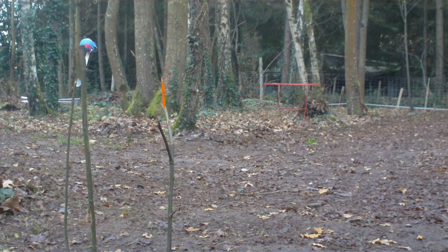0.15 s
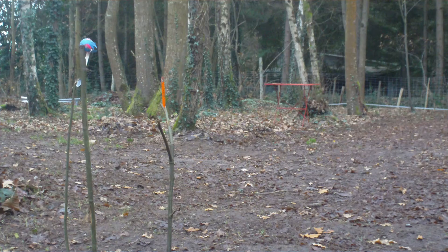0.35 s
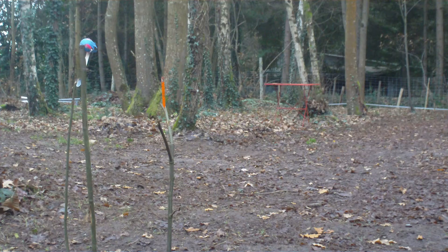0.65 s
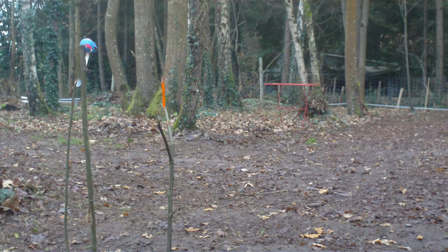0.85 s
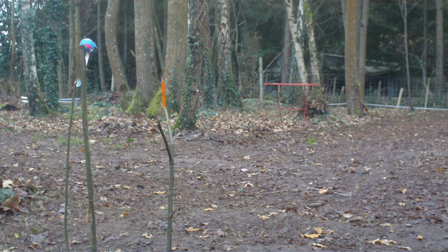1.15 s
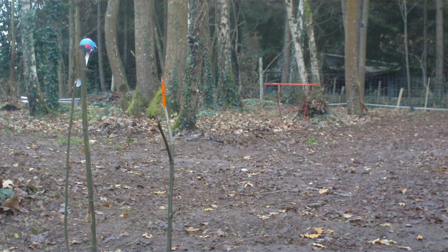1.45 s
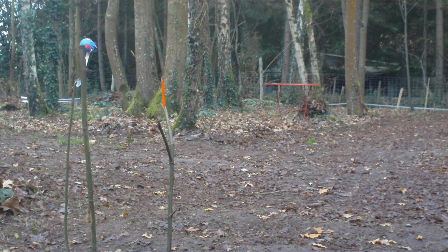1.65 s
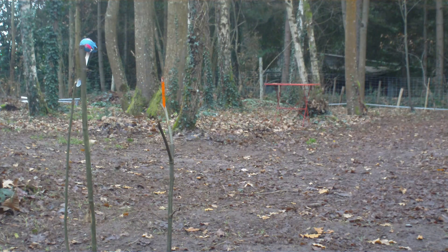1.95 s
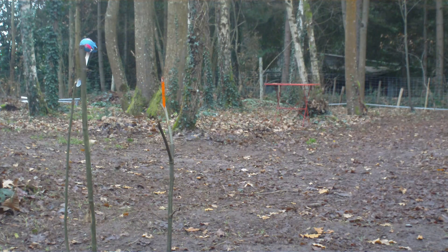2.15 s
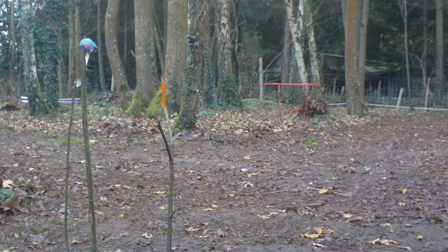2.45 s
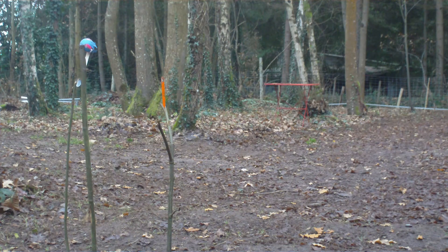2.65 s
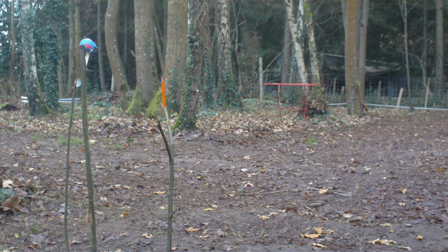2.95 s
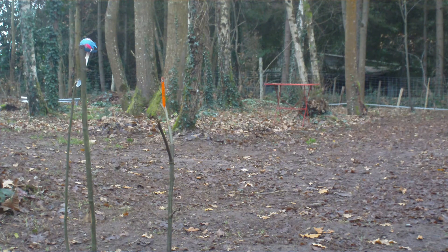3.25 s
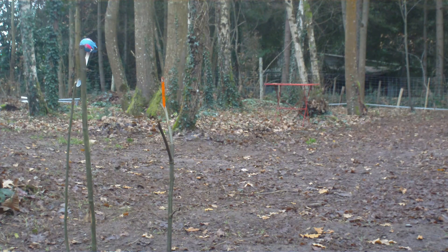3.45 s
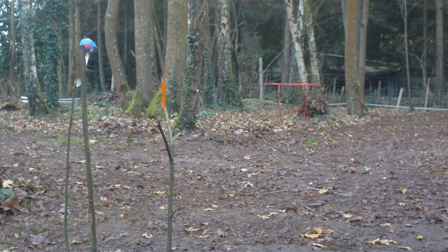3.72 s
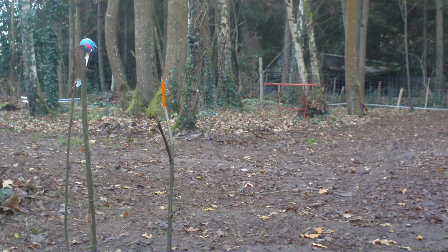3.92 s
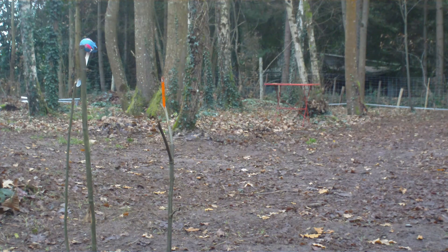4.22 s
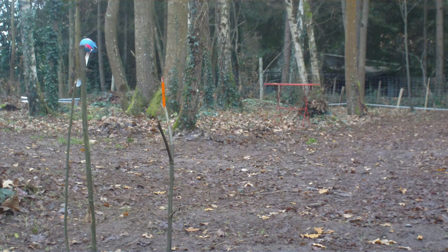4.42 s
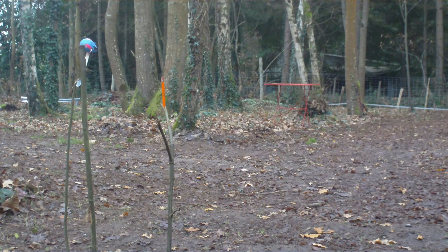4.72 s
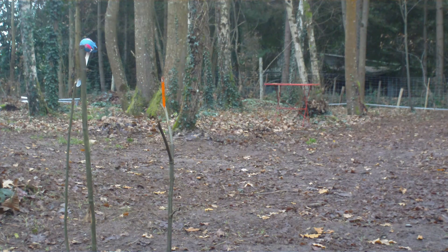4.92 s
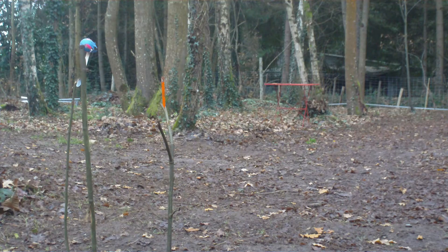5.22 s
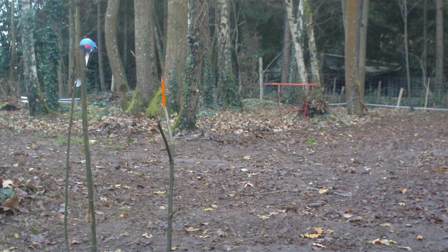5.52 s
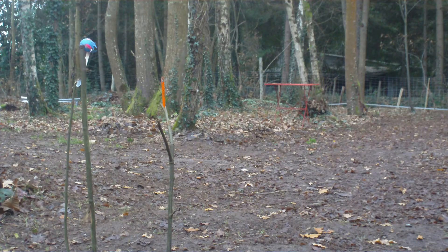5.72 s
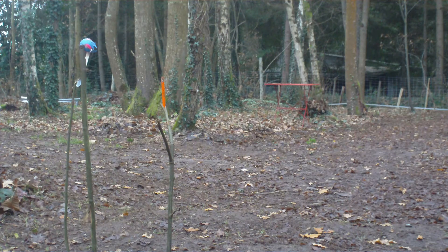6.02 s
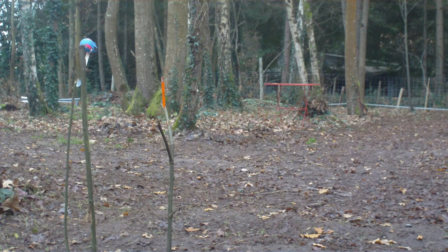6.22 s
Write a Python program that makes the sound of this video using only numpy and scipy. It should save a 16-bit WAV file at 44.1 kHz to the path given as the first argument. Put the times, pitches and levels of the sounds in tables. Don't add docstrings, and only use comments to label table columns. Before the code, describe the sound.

A damp wood with soft distant traffic hum, faint leaf hiss, ticking drips and thin high birds. A twig knocks early on. Past the middle, slingshot bands slap, a ball hisses and whistles by, and a very loud smack hits a target right at the microphone, overloading it. Trunk echoes scatter and fade, then drips, buzzing birdsong and a faint leaf rustle return.

```python
import sys
import numpy as np
from scipy import signal
from scipy.fft import rfft, irfft, next_fast_len
from scipy.io import wavfile
from scipy.ndimage import uniform_filter1d

SR = 44100
rng = np.random.default_rng(int(sys.argv[2]) if len(sys.argv) > 2 else 0)


def unload_wav(signal):
    wavfile.write(
        sys.argv[1],
        SR,
        np.round(np.clip(np.atleast_2d(signal).T, -1, 1) * 32767).astype(np.int16),
    )


def makeup_ratio(level_db):
    decades = np.asarray(level_db, float) / 20
    return 10 ** decades


N = 280917


def evened(x):
    return x / np.sqrt(np.mean(x ** 2) + 1e-20)


def read(points, hz):
    f, value = np.transpose(points)
    return np.interp(np.log(hz + 1), np.log(f + 1), value)


def add(mix, start_s, sound):
    part = mix[round(start_s * SR):][:len(sound)]
    part += sound[:len(part)]


def swell(count, smooth):
    return evened(uniform_filter1d(rng.standard_normal(count), size=smooth))


def span(rows):
    s, *columns = np.transpose(rows)
    t = np.arange(s[0], s[-1], 1 / SR)
    return s[0], [np.interp(t, s, c) for c in columns]


def burst(start_s, hold_s, level_db, rise_s, fall_s, depth_db=27.0):
    low_db, end_s = level_db - depth_db, start_s + hold_s
    start, (curve_db,) = span([(start_s - rise_s, low_db), (start_s, level_db),
                               (end_s + 1e-4, level_db), (end_s + fall_s, low_db)])
    return start, curve_db


def coloured(x, points):
    size = next_fast_len(len(x))
    gain = makeup_ratio(read(points, np.fft.rfftfreq(size, 1 / SR)))
    return irfft(rfft(x, size) * gain, size)[:len(x)]


def resonate(x, hz, width_hz):
    turn = np.exp(2j * np.pi * np.cumsum(hz * np.ones(len(x))) / SR)
    r = np.exp(-np.pi * width_hz / SR)
    return 2 * (turn * signal.lfilter([1 - r], [1, -r], x / turn)).real


def dulled(x, dull):
    return (1 - dull) * x + dull * uniform_filter1d(x, size=15)


def patter(level_db, hz, spread_hz, t60_s):
    t = np.arange(2000) / SR
    drive = 0.19 * rng.standard_normal(size=2000) * makeup_ratio(-60 * t / t60_s)
    drive[0] = 1
    sound = resonate(resonate(drive, hz, spread_hz), hz, spread_hz)
    return makeup_ratio(level_db) * sound / abs(sound).max()


# [freq_hz, t60_s]
WOOD_DECAY = [(60, .22), (250, .36), (1000, 0.79), (2500, .72), (5000, .62), (10000, 0.3), (16000, .24)]


def wood(x, linger=1.):
    taps = np.zeros(SR)
    at = np.arange(120, SR - 24, 24) + rng.integers(0, 24, (SR - 121) // 24)
    taps[at] = rng.choice([-1., 1.], len(at)) * makeup_ratio(4.5 * rng.standard_normal(len(at)))
    hz, t, z = signal.stft(taps, SR, nperseg=256)
    decay_db = -60 * t / (linger * read(WOOD_DECAY, hz)[:, None])
    tail = signal.istft(z * makeup_ratio(decay_db), SR, nperseg=256)[1]
    return signal.fftconvolve(x, tail / np.linalg.norm(tail))[:N]


# [freq_hz, density_db]
RUMBLE_SPECTRUM = [(15, -30), (25, -9), (60, -3), (130, -2.5), (200, -6.5), (350, -14.5), (800, -40)]
# [freq_hz, density_db]
TRAFFIC_SPECTRUM = [(40, -36), (130, -6.5), (250, 1), (366, -1), (745, -4.5), (980, -2), (1230, -6),
                    (2090, -10), (3970, -22.5), (6000, -32.5), (9000, -61)]
# [freq_hz, density_db]
LEAF_SPECTRUM = [(800, -22), (2500, -6), (4000, -2.5), (7000, 1.5), (9000, -4.5), (10500, -11.5),
                 (12500, -8.5), (15000, -8)]
RUMBLE_DB, TRAFFIC_DB, LEAVES_DB = -61.5, -55, -65.5
RECEDE_DB_PER_S, LULL_DB_PER_S = -0.43, -.3
DUCK_DB, DUCK_S = -2.5, .3


def air():
    t, out = np.arange(N) / SR, np.zeros(N)
    duck_db = DUCK_DB * np.clip((t - SMACK_S) / DUCK_S, 0, 1)
    traffic_db = TRAFFIC_DB + RECEDE_DB_PER_S * t + duck_db
    leaves_db = LEAVES_DB + LULL_DB_PER_S * t + duck_db
    layers = (RUMBLE_SPECTRUM, RUMBLE_DB), (TRAFFIC_SPECTRUM, traffic_db), (LEAF_SPECTRUM, leaves_db)
    for spectrum, level_db in layers:
        swell_db = 0.5 * evened(uniform_filter1d(swell(N, 3000), size=3000))
        out += evened(coloured(rng.standard_normal(N), spectrum)) * makeup_ratio(level_db + swell_db)
    return out


# [start_s, peak_db, leaf_hz, spread_hz]
DROPS = [(.0515, -54, 6360, 2500), (.5395, -64, 9000, 2500), (.733, -52, 3680, 1200),
         (.7958, -45, 4630, 900), (.847, -56, 10500, 3500), (.8655, -49, 5750, 1900),
         (.903, -53, 3000, 800), (.977, -46, 7000, 5000), (1.2285, -52, 4800, 2200),
         (1.4625, -50.5, 3870, 900), (2.3092, -41, 3800, 3500), (2.3175, -45, 7000, 4500),
         (2.619, -54, 7300, 4000), (2.777, -57, 6000, 3000), (3.022, -56, 7500, 3500),
         (3.1235, -55, 6500, 4000), (3.545, -52, 4000, 3000), (3.6565, -46, 7000, 5000),
         (3.9425, -40.5, 2500, 3000), (4.0442, -48, 3500, 4000), (4.9795, -60, 8500, 3000),
         (4.9965, -47, 7500, 5000), (5.8045, -53.5, 7100, 1800), (6.3365, -48, 6000, 5000)]
# [start_s, peak_db, leaf_hz, spread_hz]
FIZZING_DROPS = [
    (.7335, -54, 7500, 3000),
    (1.2573, -52, 7750, 2000),
    (2.229, -51.5, 6940, 2500),
    (2.3465, -50, 8000, 3500),
    (5.8905, -42.5, 4200, 5000),
]
DROP_T60_S, FIZZ_T60_S = .016, .045
LITTER_HZ, LITTER_DB = 7810, -5.
SPLASH_DB, SPLASH_DB_PER_KHZ = -30., 2.2


def drips():
    out = np.zeros(N)
    for rows, t60_s in (DROPS, DROP_T60_S), (FIZZING_DROPS, FIZZ_T60_S):
        for start_s, peak_db, leaf_hz, spread_hz in rows:
            splash_db = peak_db + SPLASH_DB + SPLASH_DB_PER_KHZ * (leaf_hz + spread_hz) / 1000
            leaf = patter(peak_db + 2.5, leaf_hz, spread_hz, t60_s)
            litter = patter(peak_db + LITTER_DB, LITTER_HZ, 3500, t60_s)
            splash = patter(splash_db + 6.0, 14000, 3500, .01)
            add(out, start_s, leaf + litter + splash)
    return out


# [start_s, length_s, top_hz, fall_hz, level_db]
BIRD_NOTES = [(0.274, .19, 7380, 400, -66), (0.487, 0.14, 6980, 150, -67), (2.433, 0.13, 7220, 201, -61.5),
              (2.63, 0.22, 7060, 298, -70), (3.055, .21, 7350, 200, -73), (3.29, .13, 7050, 80, -69),
              (3.83, 0.11, 7330, 200.2, -66), (3.96, .09, 7156, 100, -68), (4.655, 0.15, 7520, 480, -61),
              (4.82, 0.074, 7450, 300, -70.5), (4.915, .135, 7200, 150, -61.5),
              (5.081, 0.12, 7000, 200, -64.5), (5.225, .09, 6920, 80, -72), (5.33, .14, 7680, 450, -64),
              (5.46, .115, 7480, 250, -69), (5.579, 0.078, 7030, 201, -72)]
SCOOP_S, SCOOP_HZ, SCOOP_DB, NOTE_FADE_DB = .022, 450, -11., -7.5
BUZZ_RATE_HZ, BUZZ_HZ, BUZZ_DB, WANDER_HZ = 160, 130, 3.3, 60


def birds():
    out = np.zeros(N)
    for start_s, length_s, top_hz, fall_hz, level_db in BIRD_NOTES:
        start_s, (pitch_hz, curve_db) = span([
            (start_s, top_hz - SCOOP_HZ, level_db + SCOOP_DB),
            (start_s + SCOOP_S, top_hz, level_db),
            (start_s + length_s, top_hz - fall_hz, level_db + NOTE_FADE_DB)])
        count = len(pitch_hz)
        buzz = 2 * np.pi * BUZZ_RATE_HZ * np.arange(count) / SR
        wander = swell(SR // 2, 400)[:count]
        turns = np.cumsum(pitch_hz + BUZZ_HZ * np.sin(buzz) + WANDER_HZ * wander) / SR
        level = 1.1 * makeup_ratio(curve_db + BUZZ_DB * np.cos(buzz))
        add(out, start_s, level * np.sin(2 * np.pi * turns) * signal.windows.tukey(count, .1))
    return out


# [freq_hz, density_db]
TWIG_SPECTRUM = [(120, -39), (200, -7), (1260, -0.5), (1490, -9), (1950, -11.5), (4470, -19.5),
                 (6530, -14.5), (9210, -20.5), (11400, -27), (15000, -24)]
# [start_s, peak_db, pitch_hz, spread_hz, t60_s]
TWIG_TAPS = [
    (1.701, -42, 690, 600, .02),
    (1.7073, -42, 1050, 600, .025),
    (1.7123, -45, 900, 600, .03),
]
KNOCK_S, KNOCK_DB, KNOCK_RISE_S, KNOCK_FALL_S = 1.702, -43.5, .004, 0.088


def knock():
    start_s, curve_db = burst(KNOCK_S, 0, KNOCK_DB, KNOCK_RISE_S, KNOCK_FALL_S)
    crackle = rng.standard_normal(SR // 4) * makeup_ratio(2.3 * swell(SR // 4, 40))
    out = np.zeros(N)
    add(out, start_s, makeup_ratio(curve_db) * evened(coloured(crackle, TWIG_SPECTRUM))[:len(curve_db)])
    for start_s, *tap in TWIG_TAPS:
        add(out, start_s, patter(*tap))
    return out


# [peak_db, pitch_hz, spread_hz, t60_s]
FORK_MODES = [(-35, 215, 150, .03), (-38, 410, 120, 0.022), (-40, 920, 200, .018), (-33, 1900, 400, .02)]
# [start_s, peak_db, pitch_hz]
BAND_SLAPS = [
    (4.0593, -30.5, 2900),
    (4.0598, -22, 6100),
    (4.0635, -33, 2000),
    (4.065, -27.5, 6660),
    (4.0711, -31, 6300),
    (4.0775, -38, 13600),
    (4.0942, -30, 13460),
    (4.0943, -34, 7040),
    (4.097, -43, 1800),
    (4.1015, -38, 2800),
]
THUD_S = 4.058
SLAP_SPREAD, SLAP_T60_S, SLAP_T60_HZ = .38, .022, 9000


def bands():
    out = np.zeros(N)
    for mode in FORK_MODES:
        add(out, THUD_S, patter(*mode))
    for start_s, peak_db, hz in BAND_SLAPS:
        t60_s = SLAP_T60_S / (1 + hz / SLAP_T60_HZ)
        add(out, start_s, patter(peak_db, hz, min(SLAP_SPREAD * hz, 3000), t60_s))
    return out


# [freq_hz, density_db]
WAKE_SPECTRUM = [(120, -45.5), (200, -17), (683, -15), (806, -18.5), (1400, -10), (2290, -12.5),
                 (2860, -7.5), (7270, -7.5), (11300, -19), (14900, -19), (16000, -38.5)]
RELEASE_S, LASH_DB, LASH_RISE_S, LASH_T60_S = 4.058, -39.5, .006, .07
PASS_S, SPEED_M_S, MISS_M = 4.288, 60, 1.1
WAKE_DB, CRUISE_DB, WAKE_T60_S, DULL = -35., -48.5, .28, .22
WHISTLE_S, WHISTLE_HZ, SAG_HZ_PER_S, WHISTLE_DB = 4.215, 1350, 9500, -43.5
TUMBLE_HZ, TUMBLE_DB = 50, 4.5


def ball():
    t = 4 + np.arange(SR // 2) / SR
    near = MISS_M / np.hypot(MISS_M, SPEED_M_S * (t - PASS_S))
    since_s, stopped_s = np.maximum(t - RELEASE_S, 0), np.maximum(t - SMACK_S, 0)
    lash = makeup_ratio(LASH_DB - 60 * since_s / LASH_T60_S)
    flight = np.hypot(makeup_ratio(CRUISE_DB), makeup_ratio(WAKE_DB) * near) * makeup_ratio(-60 * stopped_s / WAKE_T60_S)
    onset = makeup_ratio(-20 * np.maximum(RELEASE_S - t, 0) / LASH_RISE_S)
    flutter_db = 2.0 * swell(len(t), 90)
    hiss = evened(coloured(rng.standard_normal(len(t)), WAKE_SPECTRUM))
    wake = (lash + flight) * onset * makeup_ratio(flutter_db) * dulled(hiss, DULL * (1 - near))

    pitch_hz = np.clip(WHISTLE_HZ - SAG_HZ_PER_S * (t - PASS_S), 500, 3000)
    sings = np.clip((t - WHISTLE_S) / .01, 0, 1) * (stopped_s == 0) * near ** 1.6
    tone = 1.1 * np.sin(2 * np.pi * np.cumsum(pitch_hz) / SR)
    breath = resonate(resonate(rng.standard_normal(len(t)), pitch_hz, 220), pitch_hz, 220)
    throb_db = TUMBLE_DB * np.cos(2 * np.pi * TUMBLE_HZ * (t - PASS_S + .003))
    whistle = sings * makeup_ratio(WHISTLE_DB + throb_db) * (tone + .6 * evened(breath))
    out = np.zeros(N)
    add(out, t[0], wake + whistle)
    return out


# [pitch_hz, level_db, t60_s]
TARGET_MODES = [(240, -13, 0.045), (387, -11, 0.03), (539.7, -12.5, 0.017), (723, -2, .01),
                (1200, -8, 0.0056), (1759, -9.5, 0.0047), (2900, -16, .005), (5800, -21.5, 0.003),
                (8000, -21.5, .004)]
# [start_s, level_db, polarity, treble_top_hz]
BLOW_RETURNS = [
    (4.318, 1, 1, 8980),
    (4.3184, 4, -1, 15900),
    (4.3191, -5.5, 1, 3496),
    (4.3206, -2.5, 1, 1800),
    (4.3233, -5, -1, 2300),
    (4.328, -10, 1, 2997),
    (4.3283, -12, -1, 8500),
    (4.3347, -11.5, -1, 1525),
    (4.342, -22.5, 1, 1810),
]
SMACK_S = BLOW_RETURNS[0][0]
# [freq_hz, gain_db]
TARGET_HOLLOW = [(3300, 0), (4200, -6.5), (5200, 0)]


def smack():
    t = np.arange(4000) / SR
    body = sum(makeup_ratio(level_db - 60 * t / t60_s) * np.sin(2 * np.pi * hz * t + 1.0)
               for hz, level_db, t60_s in TARGET_MODES)
    out = np.zeros(N)
    for start_s, level_db, polarity, top_hz in BLOW_RETURNS:
        crack = makeup_ratio(-24.0 - 60 * t / 0.0072) * rng.standard_normal(size=4000)
        lowpass = signal.butter(N=2, Wn=top_hz, fs=SR)
        add(out, start_s, np.sign(polarity) * makeup_ratio(level_db) * signal.lfilter(*lowpass, body + crack))
    return coloured(out, TARGET_HOLLOW)


# [pitch_hz, level_db, t60_s]
POST_MODES = [(201, -34, .35), (255, -32, .45), (379.8, -35, 0.21), (520, -33, .25), (600, -32, .2),
              (1050, -32, 0.2)]


def stake():
    t, out = np.arange(SR // 2) / SR, np.zeros(N)
    for hz, level_db, t60_s in POST_MODES:
        rattle = evened(resonate(rng.standard_normal(len(t)), hz, 45))
        add(out, SMACK_S, .7 * makeup_ratio(level_db - 60 * t / t60_s) * rattle)
    return out


# [freq_hz, density_db]
SCATTER_SPECTRUM = [(80, -28), (200, 0.5), (500, -0.5), (1000, 2), (2000, -3), (3200, -7), (4200, -13.5),
                    (6500, -12), (10000, -19.5), (16000, -28)]
# [freq_hz, gain_db]
FAR_WOOD = [(300, -9), (1000, -2.5), (3000, 2), (7000, 3)]


def echoes():
    bang = np.zeros(N)
    bang[round(SMACK_S * SR)] = 1
    bang = coloured(bang, SCATTER_SPECTRUM)
    near = makeup_ratio(14.0) * wood(bang, linger=.13) + makeup_ratio(3.5) * wood(bang, linger=.4) + wood(bang, linger=.85) * makeup_ratio(1.)
    return near + makeup_ratio(-3.) * wood(coloured(bang, FAR_WOOD), linger=1.9)


# [start_s, peak_db, pitch_hz]
TRUNK_ECHOES = [
    (4.3615, -28, 1800),
    (4.376, -35, 1800),
    (4.38, -30, 2800),
    (4.3932, -27, 1800),
    (4.405, -39, 2200),
    (4.4095, -41, 3000),
]


def trunks():
    out = np.zeros(N)
    for start_s, peak_db, hz in TRUNK_ECHOES:
        add(out, start_s, patter(peak_db, hz, .5 * hz, .012))
    return out


# [start_s, hold_s, level_db]
LEAF_STIRS = [
    (5.18, 0.0047, -72.5),
    (5.25, .005, -72),
    (5.346, 0.36, -72),
]
STIR_RISE_S, STIR_FALL_S = 0.055, 0.065


def rustle():
    grains = rng.standard_normal(N) * makeup_ratio(4.0 * swell(N, 150))
    level = np.zeros(N)
    for start_s, hold_s, level_db in LEAF_STIRS:
        start_s, curve_db = burst(start_s, hold_s, level_db, STIR_RISE_S, STIR_FALL_S, depth_db=19.0)
        add(level, start_s, makeup_ratio(curve_db))
    dry_leaf = [(3500, -25.5), (4800, -2), (7000, -4), (8500, -8), (11000, -28)]  # freq_hz, density_db
    return level * evened(coloured(grains, dry_leaf))


# [freq_hz, gain_db]
AIR_EDGE = [(20, 0), (15300, 0), (15420, -40), (20000, -40)]


def scene():
    song = birds()
    small = drips() + knock() + bands() + ball() + rustle()
    blow = smack() + stake() + echoes() + trunks()
    near = blow + small + makeup_ratio(-13.5) * wood(small, linger=.4)
    far = makeup_ratio(-4.5) * song + makeup_ratio(-3) * wood(song, linger=1.6)
    return (near + far + coloured(air(), AIR_EDGE))[None]


def patchy(x, depth_db):
    hz, t, z = signal.stft(x, SR, nperseg=1024)
    cells = uniform_filter1d(rng.standard_normal(z.shape), size=4, axis=0)
    cells = evened(uniform_filter1d(cells, size=3, axis=1))
    share = np.clip((hz[:, None] - 8500) / 3500, 0, 1)
    dropped = np.clip(2 * (cells - .7), 0, 1)
    return signal.istft(z * makeup_ratio(-depth_db * share * dropped), SR, nperseg=1024)[1][:N]


def top_cut(x):
    return signal.sosfilt(signal.butter(12, 16260, fs=SR, output="sos"), x)


# [freq_hz, gain_db]
CHAIN_GAP = [(20, -12.5), (70, -3), (150, -1.5), (9600, 0.5), (10850, -4), (11080, -23), (11500, -24.5),
             (11750, -5), (12100, -3.5), (15600, 0), (16050, -10), (16300, -50), (17000, -69)]
# [freq_hz, gain_db]
CHAIN_EDGE = [(20, 0), (15350, 0), (15550, -9), (16000, -12), (16300, -60), (20000, -60)]


def record(dry):
    overloaded = np.clip(dry[0], -1.15, 1.15)
    heard = patchy(coloured(overloaded, CHAIN_GAP), depth_db=18.)
    heard = coloured(np.clip(heard, -.97, .97), CHAIN_EDGE)
    return top_cut(heard[None])


dry = scene()
out = record(dry)
unload_wav(out)
```